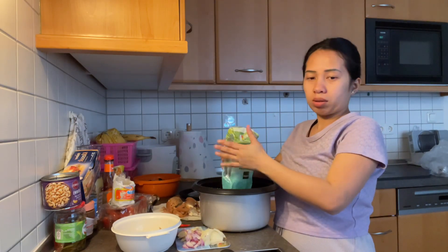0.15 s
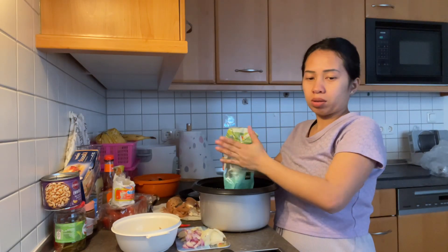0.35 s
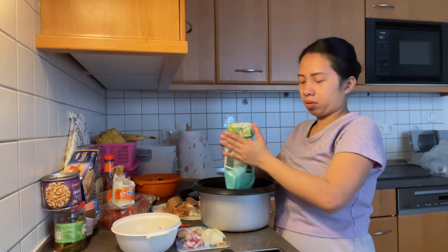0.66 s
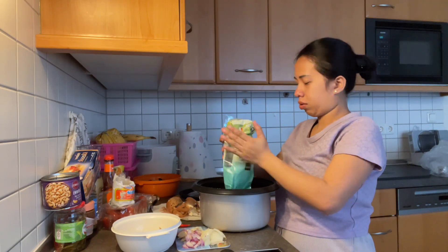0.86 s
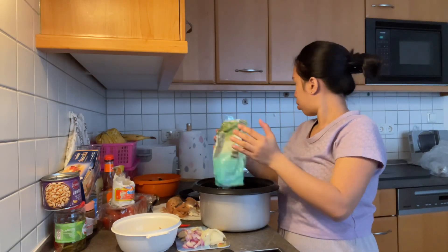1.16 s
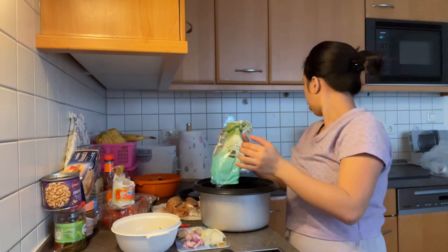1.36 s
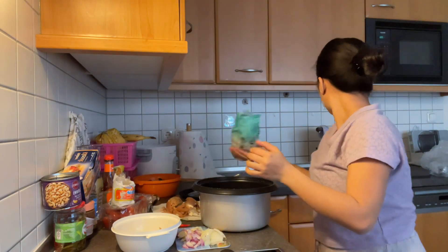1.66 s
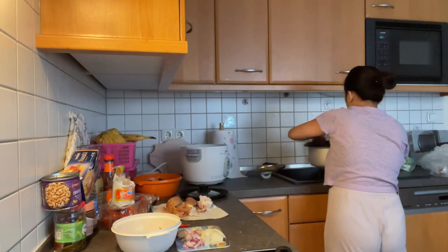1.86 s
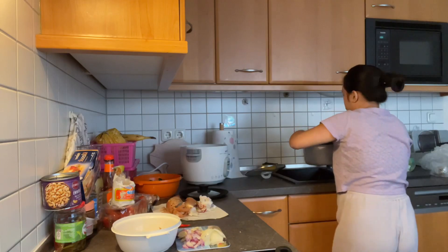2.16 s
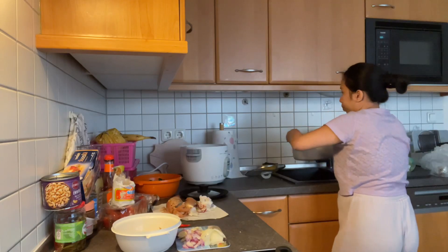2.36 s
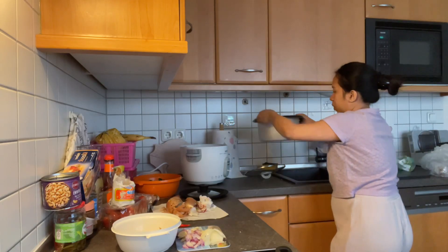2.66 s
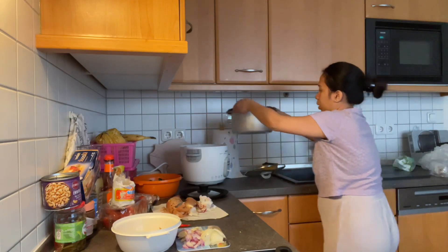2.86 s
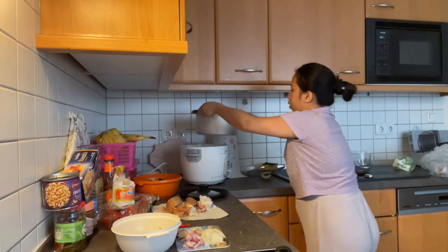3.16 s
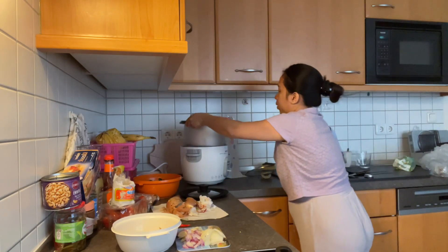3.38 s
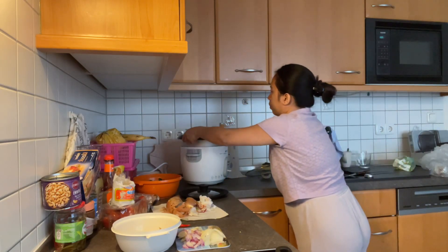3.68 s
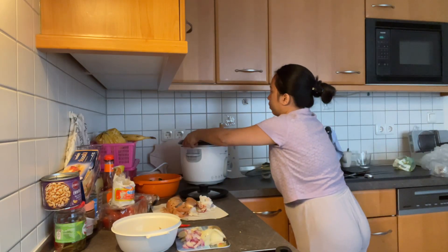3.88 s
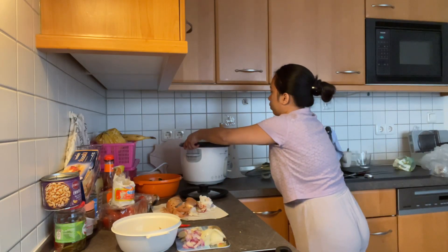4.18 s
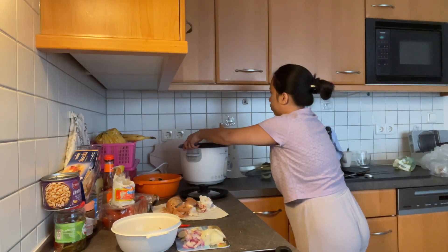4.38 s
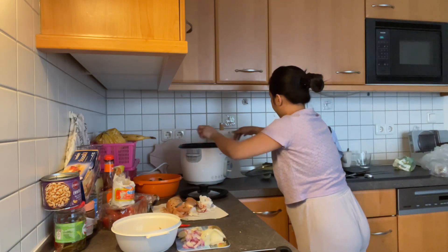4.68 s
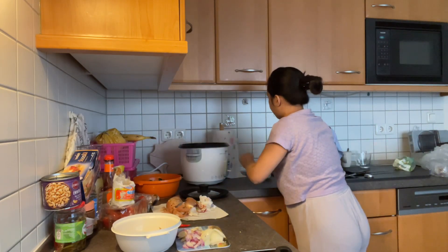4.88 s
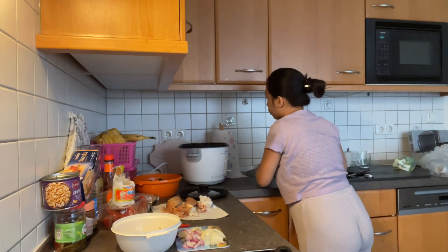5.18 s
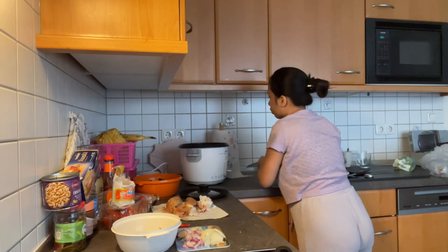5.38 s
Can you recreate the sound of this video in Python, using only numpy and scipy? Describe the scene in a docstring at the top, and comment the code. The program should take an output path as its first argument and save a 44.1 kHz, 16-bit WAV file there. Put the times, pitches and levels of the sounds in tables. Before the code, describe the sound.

Rhythmic bursts of dry grain and bag crackle in a tiled kitchen, a brief gap, then sparse clicks, a dull thud and light knocks.

```python
"""Dry rice is shaken from a plastic bag into a metal pot in a small tiled kitchen: grain noise, two-band
sprays, trickles and film snaps sound through the resonant hollow of pot and bag; damped sines make the bag flap.
After a short break come dry ticks of paired damped modes, then the pot, carried over, knocks down into a rice
cooker as contact noise rings its modes, and a dull thud of low noise follows.
Room rumble and faint rustle lie behind, with a low hum after the break."""
import sys
import numpy as np
from scipy import signal
from scipy.fft import rfft, irfft
from scipy.io import wavfile

SR = 44100
rng = np.random.default_rng(int(sys.argv[2]) if len(sys.argv) > 2 else 0)


def file_out(sig):
    """Save sig as 16-bit WAV at sys.argv[1]."""
    # one column per channel
    cols = np.atleast_2d(sig).T
    # limit, then scale
    lim = np.clip(cols, -1, 1)
    pcm = np.round(lim * 32767).astype(np.int16)
    wavfile.write(sys.argv[1], SR, pcm)


N = 244049
TIME = np.arange(N) / SR
BREAK_S = 1.768
WALL_LAG_MS = -0.7  # sound by way of the tiled side wall reaches the left channel first


def from_db(db):
    """Decibels to amplitude gain."""
    return 10 ** (np.asarray(db) / 20)


def rms_one(x):
    """Scale to unit rms."""
    return x / np.sqrt(np.mean(x ** 2) + 1e-20)


def level(rows):
    """Gain over time, interpolated in dB from rows of (t/s, level/dB)."""
    return from_db(np.interp(TIME, *np.transpose(rows)))


def at_hz(points, hz):
    """Read a table on a log-frequency axis."""
    points = np.array(points)
    return np.interp(np.log(np.maximum(hz, 1)), np.log(points[:, 0]), points[:, 1])


def cut(x, hz, kind):
    """Butterworth filter, design order 2."""
    return signal.sosfilt(signal.butter(2, hz, kind, fs=SR, output="sos"), x + 1e-18)


def colour(x, spectrum, size=8192):
    """Minimum-phase spectral filter that keeps the power of white noise."""
    gain = from_db(at_hz(spectrum, np.fft.rfftfreq(size, 1 / SR)))
    cepstrum = irfft(np.log(gain))
    # folding the cepstrum to positive time makes the response causal
    response = irfft(np.exp(rfft(2 * cepstrum[:size // 2], size)))
    return signal.fftconvolve(x, response / np.linalg.norm(response))[:N]


def resonance(x, hz, width_hz):
    """Two-pole band-pass with peak gain near 1."""
    r = np.exp(-np.pi * width_hz / SR)
    zeros = np.array([1, 0, -1]) * (1 - r * r) / 2
    poles = [1, -2 * r * np.cos(2 * np.pi * hz / SR), r * r]
    return signal.lfilter(zeros, poles, x + 1e-18)


def burst(start_s, rise_s, fall_s):
    """Envelope: linear rise to 1, exponential fall."""
    age = TIME - start_s
    return np.clip(age / rise_s, 0, 1) * np.exp(-np.clip((age - rise_s) / fall_s, 0, 20))


def bursts(start_s, level_db, rise_s, fall_s):
    """Sum of bursts; each setting is one number or one per burst."""
    rows = zip(*np.broadcast_arrays(start_s, level_db, rise_s, fall_s))
    return sum(from_db(db) * burst(s, rise, fall) for s, db, rise, fall in rows)


def grains(per_s, spread_db):
    """Random one-sample impacts of uneven size and sign; rms 1."""
    sizes = from_db(spread_db * np.minimum(rng.exponential(1, N), 4))
    signs = rng.choice([-1, 1], N)
    return rms_one(sizes * signs * (rng.random(N) < per_s / SR))


def two_tone(x, body, treble, split_hz):
    """Unit-rms bands below and above a split, each with its own envelope."""
    return body * rms_one(cut(x, split_hz, "low")) - treble * rms_one(cut(x, split_hz, "high"))


def stereo_noise(alike, mid, side):
    """Mix two noises into left and right with the given likeness."""
    return np.sqrt(1 + alike) * mid + np.sqrt(1 - alike) * side * [[1], [-1]]


def balance(pan_db):
    """Left and right gains that differ by pan_db."""
    return from_db([[pan_db / 2], [-pan_db / 2]])


# Kitchen decay: f/Hz, t60/s
DECAY_T60 = [(100, 0.65), (500, 0.35), (1500, 0.48), (4000, 0.39), (8000, 0.41), (15000, 0.098)]


def kitchen(x, wet_db, early_db, lag_ms, pan_db, early_fall_s=0.0036, early_alike=0.61, size=22050):
    """Direct sound, early reflections off tiles and cupboards, and a tail with its own decay in each band."""
    spacing_m, sound_m_per_s = 0.3, 343
    age, hz = np.arange(size) / SR, np.fft.rfftfreq(size, 1 / SR)
    # long waves reach both channels alike, short ones do not
    alike = np.sinc(2 * hz * spacing_m / sound_m_per_s)
    white = stereo_noise(alike, *rfft(rng.standard_normal((2, size))))
    tail = 0
    edges_hz = np.append(0, np.geomspace(200, SR / 2, 10))
    for low, high in zip(edges_hz, edges_hz[1:]):
        band = irfft(white * (hz >= low) * (hz < high))
        tail = tail + band * from_db(-60 * age / at_hz(DECAY_T60, (low + high) / 2))
    tail = tail * np.clip(age / 0.0093, 0, 1)
    # small nearby surfaces throw back little bass
    mid, side = rng.standard_normal((2, size)) * (age > 0.001) * np.exp(-age / early_fall_s)
    early = cut(stereo_noise(early_alike, mid, side), 230, "high")
    tail = from_db(wet_db) * tail / np.linalg.norm(tail, axis=1, keepdims=True)
    early = from_db(early_db) * early / np.linalg.norm(early, axis=1, keepdims=True)
    direct = np.array([np.interp(TIME - lag_ms / 1000, TIME, x), x])
    reflected = signal.fftconvolve(x[None], tail + early, axes=1)[:, :N]
    return (direct + reflected) * balance(pan_db)


# Room rumble spectrum: f/Hz, relative level/dB
AIR_SPECTRUM = [(22, -37), (32, -12), (43, 0.5), (65, -3.5), (100, -13), (170, -19.5), (300, -33.5),
                (1000, -38.5), (2500, -35.5), (6000, -61), (15000, -49)]
# Rustle spectrum: f/Hz, relative level/dB
CLOTH_SPECTRUM = [(200, -13), (500, -0.5), (1300, 6.5), (2200, 7.5), (2900, 6.5), (4000, 0.5), (7000, -7),
                  (9500, 7), (14000, -11.5)]
# Faint rustle of moving about: t/s, level/dB
RUSTLE_LEVEL = [(1.85, -69.5), (2.09, -73), (2.19, -64), (2.33, -81), (2.52, -68), (2.77, -78.5),
                (2.95, -68), (3.18, -77.5), (3.38, -73.5), (3.85, -74.5), (4.0, -84), (4.45, -69),
                (4.77, -83.5), (5.0, -76), (5.53, -83.5)]


def background(air_before_db=-72.5, air_after_db=-65.0, hum_hz=42.3, hum_db=-60.0):
    """Coloured-noise rumble, an appliance's steady sine hum after the break, and grainy rustle."""
    air_gain = from_db(np.where(TIME < BREAK_S, air_before_db, air_after_db))
    air = air_gain * colour(rng.standard_normal(N), AIR_SPECTRUM)
    hum = from_db(hum_db) * (TIME > BREAK_S) * np.sin(2 * np.pi * hum_hz * TIME)
    rustle = level(RUSTLE_LEVEL) * colour(grains(2500, spread_db=3.5), CLOTH_SPECTRUM)
    return (kitchen(air, wet_db=-7.0, early_db=-9.5, lag_ms=0, pan_db=9.5)
            + hum * balance(5.0)
            + kitchen(rustle, wet_db=2.5, early_db=-5.5, lag_ms=0, pan_db=-0.5))


# Dull bumps on the worktop: t/s, low level/dB, hollow level/dB, fall/s
WORKTOP_BUMPS = [(2.875, -51, -61.5, 0.043), (3.189, -61, -55.5, 0.035), (3.242, -45.5, -50, 0.017),
                 (4.161, -45.5, -59, 0.072), (4.37, -28, -38.5, 0.021), (4.425, -34, -62, 0.026),
                 (4.554, -51.5, -80, 0.016), (5.202, -38.5, -54.5, 0.028), (5.240, -42, -76, 0.046)]
# Soft handling scuffs: t/s, level/dB
HANDLING_SCUFFS = [(2.147, -62), (2.874, -61.5), (3.063, -54), (3.243, -67), (3.861, -58), (4.554, -60),
                   (5.194, -55.5), (5.391, -71.5)]
# Worktop booms as the pot's weight comes on it: t/s, level/dB
WORKTOP_BOOMS = [(3.87, -40.5), (4.135, -31.5), (4.4, -36.5), (4.62, -51)]
# Spectra of bump lows, bump hollows and scuffs: f/Hz, relative level/dB
BUMP_SPECTRUM = [(35, -10), (70, 5), (100, 5), (155, 2.5), (210, -23), (320, -37.5), (700, -51),
                 (2000, -106)]
HOLLOW_SPECTRUM = [(110, -4.5), (180, 8.5), (280, -8), (380, -12.5), (650, -15), (1200, -34), (3000, -52)]
SCUFF_SPECTRUM = [(120, 5), (300, -9), (600, 0.5), (1300, 0), (2200, -5.5), (4000, -18.5), (9000, -68.5)]


def handling(boom_hz=44.5):
    """Bumps and scuffs are enveloped coloured impacts; the loaded worktop booms as a low sine."""
    start, low_db, hollow_db, fall = np.transpose(WORKTOP_BUMPS)
    bumps = bursts(start, low_db, 0.0149, fall) * colour(grains(2700, spread_db=-0.5), BUMP_SPECTRUM)
    grit = grains(2500, spread_db=2.5)
    hollows = bursts(start, hollow_db, 0.0058, fall) * colour(grit, HOLLOW_SPECTRUM)
    scuff_envelope = bursts(*np.transpose(HANDLING_SCUFFS), rise_s=0.0091, fall_s=0.048)
    scuffs = scuff_envelope * colour(grit[::-1], SCUFF_SPECTRUM)
    boom_envelope = bursts(*np.transpose(WORKTOP_BOOMS), rise_s=0.09, fall_s=0.087)
    boom = boom_envelope * np.sin(2 * np.pi * boom_hz * TIME)
    return (kitchen(bumps, wet_db=-11.0, early_db=-29.5, lag_ms=0, pan_db=6.5)
            + kitchen(scuffs + hollows, wet_db=-3.5, early_db=2.0, lag_ms=-0.37, pan_db=2.0)
            + boom * balance(3.2))


def faint_ticks(count=4):
    """Weak ticks at random moments while the pot is carried, uneven in strength and pitch."""
    span_s, mid_db, mid_hz, knock_db = (2.4, 3.6), -53.5, 2870, -68
    draws = rng.uniform(-1.2, 1, (count, 3))
    return [(np.interp(when, [-1, 1], span_s), mid_db + 3 * strength, mid_hz * (1 + 0.1 * pitch), knock_db)
            for when, strength, pitch in draws]


# Small dry ticks: t/s, ring level/dB, f/Hz, knock level/dB
DRY_TICKS = [(2.0044, -43.5, 3210, -61), (2.0363, -47.5, 3210, -72), (2.1153, -43, 2080, -62),
             (2.1456, -35.5, 2760, -31), (2.172, -39.5, 3140, -48), (2.1822, -35, 3420, -23.5),
             (2.208, -32.5, 2900, -45), (2.2238, -34.5, 3170, -57), (2.2603, -30, 2140, -51),
             (2.391, -34, 2880, -69), (2.4132, -38.5, 2080, -58.5), (2.473, -38.5, 2930, -51),
             (2.5396, -44, 2930, -69), (2.5608, -37.5, 3010, -59), (2.596, -37.5, 3100, -65),
             (2.6364, -38, 2230, -38), (2.646, -24.5, 2750, -31.5), (2.6882, -35, 3200, -42.5),
             (2.8721, -33.5, 2740, -26.5), (2.9031, -39, 2700, -42.5), (2.9715, -35.5, 2760, -58),
             (3.0796, -37.5, 2860, -58), (3.4296, -44, 3030, -49), (3.511, -41, 2820, -44),
             (3.5149, -33, 2720, -44), (3.6123, -28, 2780, -33), (3.7322, -31.5, 2880, -45),
             (3.7773, -40.5, 2770, -63), (3.928, -34.5, 2900, -37), (3.987, -39, 2920, -58.5),
             (4.0521, -37, 2790, -44.5), (4.0671, -32.5, 2150, -29.5), (4.126, -33, 2280, -34.5),
             (4.2005, -32.5, 2710, -50), (4.5411, -35.5, 2720, -37), (4.5542, -25.5, 3060, -36),
             (4.572, -29.5, 2160, -48), (4.6204, -35, 2910, -39), (4.8285, -40, 2190, -55),
             (4.9166, -36, 2100, -42.5), (4.932, -30, 2770, -39), (5.0407, -33, 2830, -44),
             (5.3206, -47.5, 2740, -63)]
# Thin bright clicks without ring: t/s, level/dB
BRIGHT_CLICKS = [(1.9741, -40), (2.1823, -30), (2.303, -44.5), (2.4952, -42.5), (2.9038, -41),
                 (2.972, -41.5), (3.5744, -50.5), (4.716, -48), (4.959, -45.5)]


def ticks(upper_db=-8.5, upper_ratio=1.106, grit_db=-8.5, grit_width_hz=1500,
          crack_db=-51.0, crack_follows=0.12, size=2048):
    """A tick is two damped modes, gritty contact, crack and knock; a click is a bright crack alone."""
    out, age = np.zeros(N + size), np.arange(size) / SR
    usual_db = np.mean([row[1] for row in DRY_TICKS])
    crack_fall = np.exp(-age / 0.0016)
    for s, db, hz, knock_db in [*DRY_TICKS, *faint_ticks()]:
        crack_noise, knock_noise, grit_noise = rng.standard_normal((3, size))
        turn = 2 * np.pi * hz * age
        modes = np.sin(turn) + from_db(upper_db) * np.sin(upper_ratio * turn)
        ring = from_db(db) * modes * (np.exp(-age / 0.0018) - np.exp(-age / 0.0003))
        # gritty contact widens the ring
        grit = from_db(db + grit_db) * resonance(grit_noise * np.exp(-age / 0.0012), hz, grit_width_hz)
        # stronger contacts crack a little louder
        crack_gain = from_db(crack_db + crack_follows * (db - usual_db))
        crack = crack_gain * cut(crack_noise * crack_fall, [3800, 7800], "band")
        knock = from_db(knock_db) * cut(knock_noise * np.exp(-age / 0.0019), [550, 1900], "band")
        out[round(s * SR):][:size] += ring + grit + crack + knock
    for s, db in BRIGHT_CLICKS:
        click = cut(rng.standard_normal(size) * crack_fall, [3800, 16000], "band")
        out[round(s * SR):][:size] += from_db(db) * click
    return kitchen(out[:N], wet_db=-7.0, early_db=-0.5, lag_ms=0, pan_db=1.5,
                   early_fall_s=0.0068, early_alike=0.09)


# Pot knocks and settling: t/s, body level/dB, treble level/dB, fall/s, ring level/dB
POT_CONTACTS = [(4.140, -68, -37.5, 0.0066, -39.5), (4.175, -68, -55.5, 0.064, -60),
                (4.326, -63, -47, 0.0075, -53), (4.363, -48.5, -52, 0.0058, -43),
                (4.371, -41, -40, 0.015, -44.5), (4.556, -54.5, -54.5, 0.015, -65.5),
                (5.205, -73, -94, 0.027, -72)]
# Modes of the pot in the cooker: f/Hz, width/Hz, level/dB
POT_MODES = [(443, 18.2, 0), (493.6, 34, 5.5), (577, 8.3, -1), (754, 5.3, -3), (1105, 38, -5),
             (1257, 23, -11), (1380, 26, -21), (1830, 30, -5), (2320, 27, -9), (2900, 55, -9),
             (3400, 40, -18), (4220, 90, -7.5), (5270, 41, -24)]
# Contact rattle spectrum: f/Hz, relative level/dB
CLANK_SPECTRUM = [(150, -13), (300, 0.5), (550, -2), (1100, 0.5), (2000, -3.5), (4200, -9.5), (8500, -11.5),
                  (14000, -35)]


def pot_knocks():
    """The landing pot rattles in many brief contacts, which set its modes ringing."""
    start, body_db, treble_db, fall, ring_db = np.transpose(POT_CONTACTS)
    body = bursts(start, body_db, 0.0016, fall)
    treble = bursts(start, treble_db, 0.0012, fall)
    rattle = two_tone(colour(grains(5000, spread_db=0.0), CLANK_SPECTRUM), body, treble, split_hz=2330)
    contacts = grains(5000, spread_db=3.5) * bursts(start, ring_db, 0.0014, fall)
    rings = np.zeros(N)
    for hz, width_hz, db in POT_MODES:
        # a narrow mode gathers less of the rattle: gain makes up for width
        width_gain = np.sqrt(SR / (np.pi * width_hz))
        rings += from_db(db) * width_gain * resonance(contacts, hz, width_hz)
    return (kitchen(rattle, wet_db=2.0, early_db=-3.0, lag_ms=0.14, pan_db=-0.5)
            + kitchen(rings, wet_db=-3.5, early_db=-1.0, lag_ms=WALL_LAG_MS, pan_db=6.0))


# Bag shakes: t/s, spray body level/dB, spray treble level/dB, spray rise/s, flap level/dB, flap f/Hz
BAG_SHAKES = [(0.0, -42.5, -38, 0.0016, -48, 116), (0.089, -34, -35.5, 0.0074, -22, 114.7),
              (0.257, -26.5, -25, 0.0017, -21.5, 113.2), (0.417, -24.5, -29, 0.0076, -19.5, 131),
              (0.589, -24, -26, 0.0033, -23.5, 111.6), (0.769, -23.5, -25.5, 0.0032, -17, 118.8),
              (0.939, -27, -32, 0.0063, -21, 119.5), (1.116, -36.5, -44, 0.0049, -26, 125.7),
              (1.231, -56.5, -74, 0.0016, -40, 121), (1.408, -44, -65, 0.0039, -39.5, 111),
              (1.562, -63, -83, 0.0033, -44.5, 125.7), (1.611, -64, -85, .003, -44, 100)]


def bag_flaps(upper_db=-11.0, upper_ratio=1.4, linger_db=-24.0):
    """At each shake the bag walls swing briefly in a low mode and a weaker upper one."""
    delay_s, rise_s, fall_s, linger_s = 0.007, 0.014, 0.016, 0.06
    out = np.zeros(N)
    for s, _, _, _, db, hz in BAG_SHAKES:
        start = s + delay_s
        turn = 2 * np.pi * hz * (TIME - start)
        swing = burst(start, rise_s, fall_s) + from_db(linger_db) * burst(start, rise_s, linger_s)
        upper = from_db(upper_db) * np.sin(upper_ratio * turn + rng.uniform(0, 2 * np.pi))
        out += from_db(db) * swing * (np.sin(turn) + upper)
    return kitchen(out, wet_db=-14.0, early_db=-24.5, lag_ms=0, pan_db=6.0)


# Snaps of the bag's film: t/s, body level/dB, treble level/dB
FILM_SNAPS = [(0.023, -34, -41.5), (0.0474, -37, -43), (0.1438, -29.5, -38.5), (0.3106, -31.5, -43),
              (0.3436, -46.5, -32.5), (0.429, -38, -17.5), (0.4651, -29.5, -16), (0.4806, -33.5, -19),
              (0.506, -28, -27), (0.6638, -26.5, -29), (0.8151, -21.5, -36), (0.8303, -24.5, -25),
              (0.9472, -25.5, -26), (0.9832, -27.5, -38), (1.232, -75, -37), (1.3895, -45, -71),
              (1.4205, -69, -47), (1.6568, -36, -63), (1.722, -52, -77), (1.73, -45, -72)]
# Loose grains sliding as the bag empties: t/s, level/dB
SLIDING_LEVEL = [(0, -45.5), (.09, -53.5), (.35, -57.5), (.55, -52.5), (1.0, -55.5), (1.2, -66.5),
                 (1.77, -76)]
# Grain spectrum: f/Hz, relative level/dB
GRAIN_SPECTRUM = [(120, -9), (190, 10.5), (300, 1), (450, 6.5), (900, -1.5), (1600, 0.5), (2100, -7),
                  (3200, -4), (5000, -8.5), (8500, -8.5), (14000, -15.5)]
# Modes of the rice-filled pot and bag: f/Hz, width/Hz, level/dB
CAVITY_MODES = [(400, 6.5, -3), (467, 50, 6), (644, 130, 3.5), (727, 74, 0.5), (1010, 22, 9.5),
                (1149, 30, 1.5), (1194, 160, -0.5), (1594, 16, -3.5), (1624, 53, -8), (3010, 270, -8)]


def rice(strike_db=-14.5, hollow_db=-6.5, low_split_hz=750):
    """Grain sprays, trickles and film snaps excite the resonant hollow of pot and bag."""
    start, body_db, treble_db, rise, _, _ = np.transpose(BAG_SHAKES)
    body, treble = (bursts(start, db, rise, 0.015) for db in (body_db, treble_db))
    spray = two_tone(colour(grains(7000, spread_db=3.5), GRAIN_SPECTRUM), body, treble, split_hz=2730)

    snap_start, snap_body_db, snap_treble_db = np.transpose(FILM_SNAPS)
    snap_body = bursts(snap_start, snap_body_db, 0.00033, 0.003)
    snap_treble = bursts(snap_start, snap_treble_db, 0.00093, 0.003)
    film_noise = cut(colour(grains(14000, spread_db=0.0), GRAIN_SPECTRUM), 900, "high")
    film = two_tone(film_noise, snap_body, snap_treble, split_hz=4400)

    # single grains that strike bare metal, in a fine stream
    strikes = grains(260, spread_db=2.0)
    stream = grains(2500, spread_db=2.5) + from_db(strike_db) * strikes
    # each trickle sits 25 dB below its spray body
    trickle = bursts(start, body_db - 25, rise_s=0.07, fall_s=0.05)
    flow = (trickle + level(SLIDING_LEVEL)) * (TIME < BREAK_S)
    hits = spray + film + flow * cut(colour(stream, GRAIN_SPECTRUM), 410, "high")

    modes = sum(from_db(db) * resonance(hits, hz, width_hz) for hz, width_hz, db in CAVITY_MODES)
    hollow = from_db(hollow_db) * modes
    # crackle arrives straight; low body and hollow come by way of the side wall
    crackle, low = cut(hits, low_split_hz, "high"), cut(hits, low_split_hz, "low")
    return (kitchen(crackle, wet_db=-3.5, early_db=2.5, lag_ms=0.15, pan_db=1.0)
            + kitchen(low, wet_db=-3.5, early_db=0.0, lag_ms=WALL_LAG_MS, pan_db=4.5, early_alike=0)
            + kitchen(hollow, wet_db=0.5, early_db=2.5, lag_ms=WALL_LAG_MS, pan_db=3.5, early_alike=0))


def short_break(close_s=0.008, hold_s=0.024, return_s=0.046, depth_db=43.5):
    """Gain that drops quickly, holds, then recovers exponentially in dB."""
    age = TIME - BREAK_S
    recovery = np.exp(-np.maximum(age - close_s - hold_s, 0) / return_s)
    shut = np.clip(age / close_s, 0, 1) * recovery
    return from_db(-depth_db * shut)


def scene():
    """All sources in the kitchen, under the short break after the pouring."""
    sources = rice() + bag_flaps() + ticks() + pot_knocks() + handling() + background()
    return sources * short_break()


def record(dry, notch_hz=11100, notch_width_hz=1900, notch_depth=0.92, rumble_hz=28, cutoff_hz=16950):
    """The microphone loses the deepest bass and dips in the high treble; a steep low-pass cuts the top."""
    heard = cut(dry, rumble_hz, "high")
    for hz in (notch_hz - 400, notch_hz + 400):
        heard = heard - notch_depth * resonance(heard, hz, notch_width_hz)
    return signal.sosfilt(signal.cheby2(16, 70, cutoff_hz, fs=SR, output="sos"), heard)


dry = scene()
out = record(dry)
file_out(out)
```